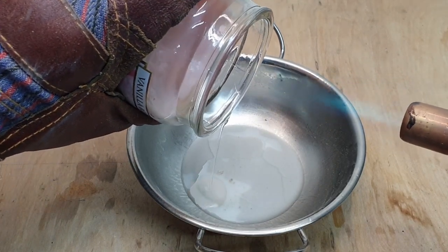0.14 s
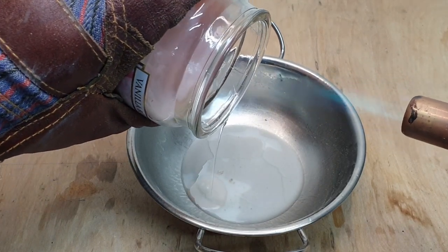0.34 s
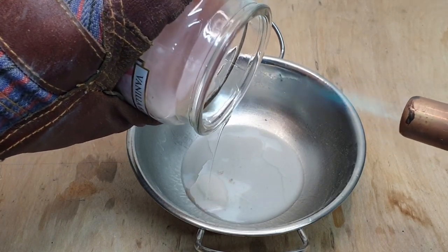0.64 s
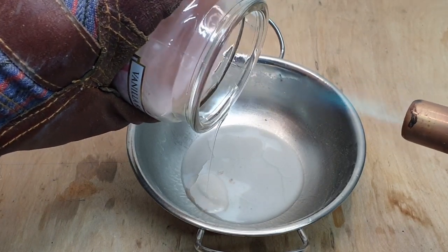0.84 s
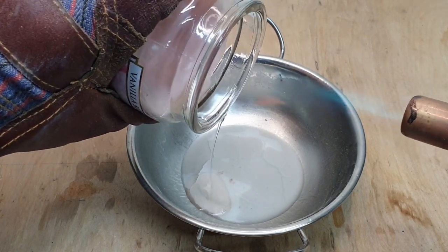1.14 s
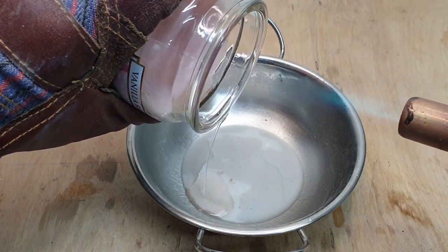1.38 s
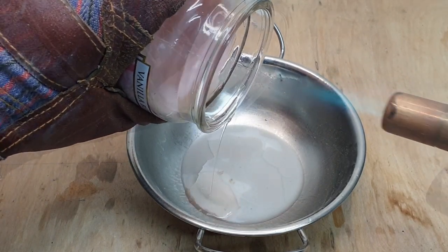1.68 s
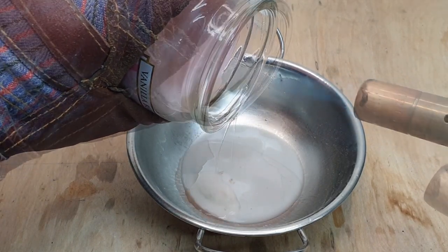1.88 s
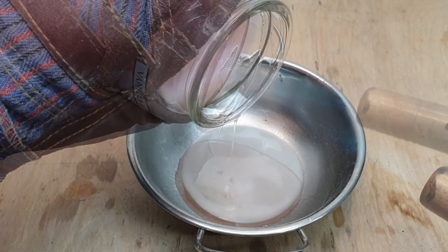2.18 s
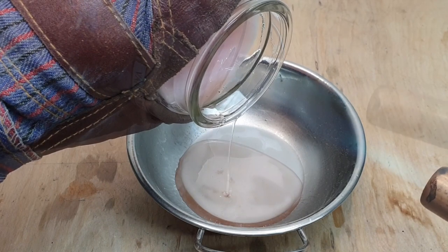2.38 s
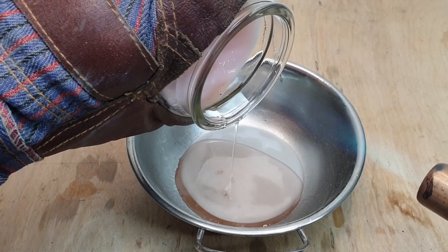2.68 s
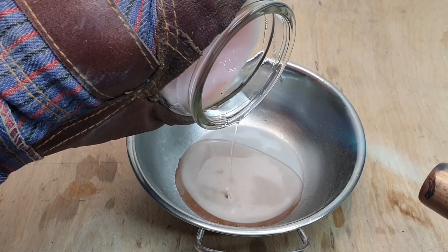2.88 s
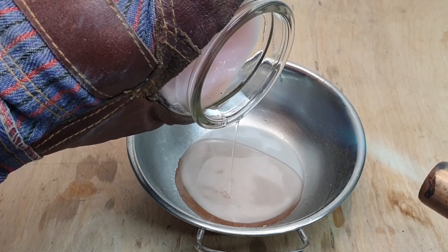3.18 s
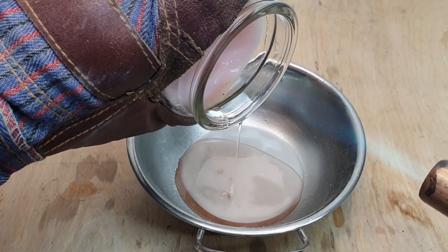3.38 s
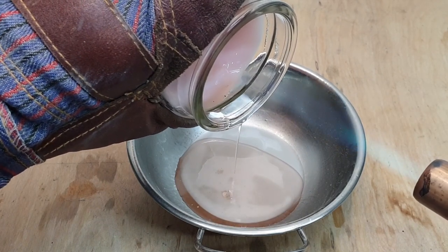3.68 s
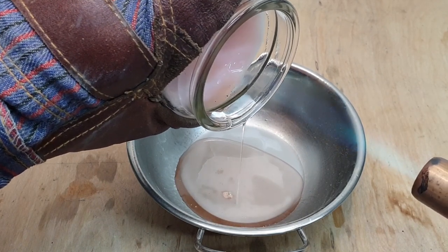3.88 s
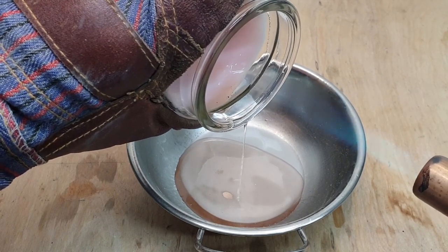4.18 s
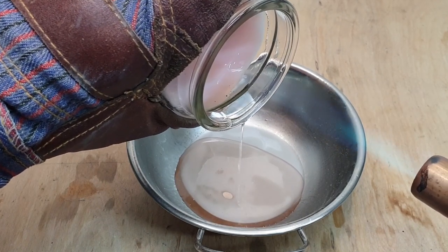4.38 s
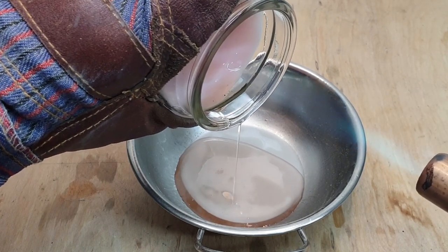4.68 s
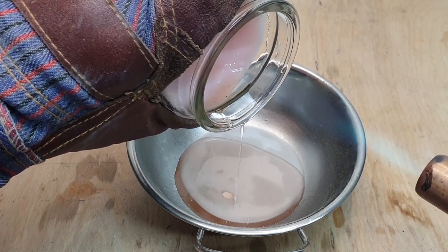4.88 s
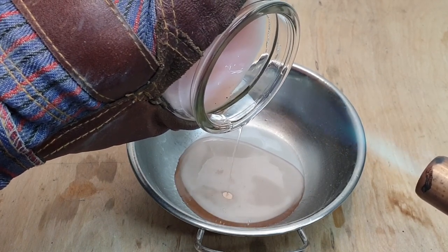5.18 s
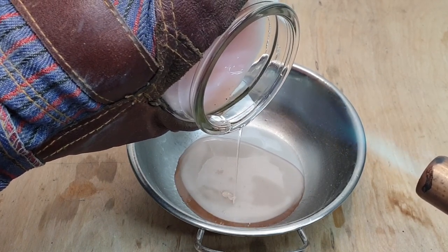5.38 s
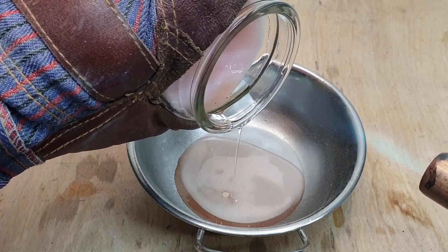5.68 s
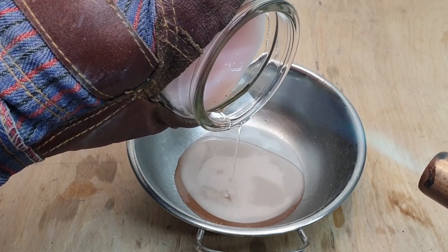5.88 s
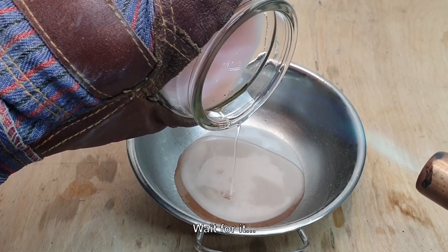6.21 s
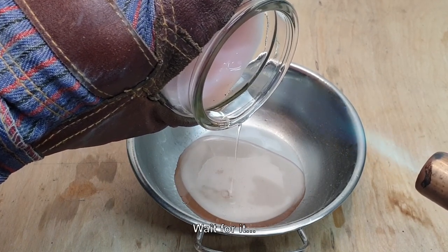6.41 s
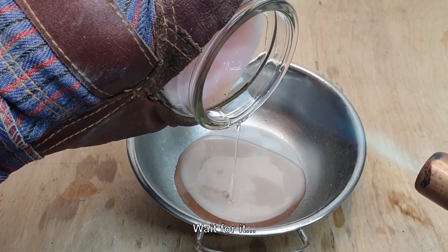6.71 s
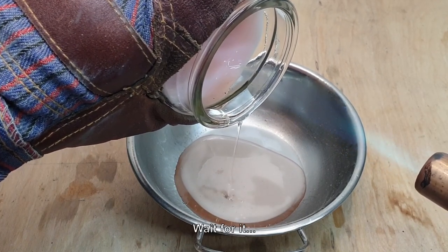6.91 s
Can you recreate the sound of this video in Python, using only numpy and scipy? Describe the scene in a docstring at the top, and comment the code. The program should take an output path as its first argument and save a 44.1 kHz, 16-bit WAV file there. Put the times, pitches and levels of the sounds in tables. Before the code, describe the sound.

Close mono pickup of a handheld gas torch in a workshop, already burning at the start and continuing to the end at about seven seconds. A soft, low roar sits under a bright gas hiss, coloured by short reflections from bowl, jar and bench, above a barely audible rumble. For the first two seconds a breathy, high nozzle whistle wavers and sags; a ragged puff flares at 0.6. Tiny wax spits tick at 0.9, 1.4 and 1.7. From 1.7 to 2.3 the hiss dips and changes tone, with quick flame flutters, then settles steadier with only faint whistle, a bright band swelling near 2.7. A short, low surge bumps at 3.2, followed by clearer spits at 3.5 and 3.7. Soft pops come at 4.0, 4.3 and 4.5, with a grainy swish around 4.25 and another at 6.0. Sparse faint spits continue as the hiss holds without ending.

```python
"""Gas torch melting wax out of a jar

Close to one microphone, a handheld torch melts wax out of a glass jar over a steel bowl in a workshop. The
flame is a steady low roar of coloured noise; the gas jet is bright noise, with a breathy nozzle whistle that is
strong in the first view and faint in the second. Bowl, jar and bench add short echoes to both. Around two
seconds the scene crossfades from the first view to a second one, and the level dips. Hot wax spits in tiny
noise bursts; brief flutters, flares, swishes, edge tones, surges and pops pass over a faint rumble."""
import sys
import numpy as np
from scipy import signal
from scipy.fft import rfft, irfft, next_fast_len
from scipy.io import wavfile
from scipy.ndimage import map_coordinates

SR = 44100
rng = np.random.default_rng(int(sys.argv[2]) if len(sys.argv) > 2 else 0)


def transcribe(u):
    """Save the signal u as a 16-bit wav file named by the first command-line argument.

    u: samples, shape (n,) or (channels, n), limited to [-1, 1]; the rate is SR.
    q: integer samples, one column per channel.
    """
    v = np.clip(np.atleast_2d(u).T, -1, 1)
    q = np.round(v * 32767).astype(np.int16)
    wavfile.write(sys.argv[1], SR, q)


N = 310905

# crossfade between the views for the bright sounds: (fade-out middle/s, its length/s, fade-in middle/s, its
# length/s)
BRIGHT_FADE = (1.86, 0.9, 2.19, 0.73)


def amp(db):
    """Decibels to gain."""
    return 10 ** (np.asarray(db) / 20)


def unit(x):
    """Scale to rms 1."""
    return x / np.sqrt(np.mean(x ** 2) + 1e-20)


def clock():
    """The time of every sample in seconds."""
    return np.arange(N) / SR


def curve(points):
    """(t/s, value) points joined by straight lines."""
    return np.interp(clock(), *np.transpose(points))


def wobble(rate):
    """A smooth random curve through `rate` random knots a second."""
    knots = rng.standard_normal(int(N * rate / SR) + 4)
    return map_coordinates(knots, [clock() * rate])


def fade(middle, length):
    """A straight rise from 0 to 1."""
    return np.clip(.5 + (clock() - middle) / length, 0, 1)


def crossfaded(first, second, timing):
    """The first view fades before the second is fully there, so the level dips between them."""
    return (1 - fade(*timing[:2])) * first + fade(*timing[2:]) * second


def swell(s, length):
    """A bell-shaped rise and fall around time s, down to 1/e^2 at `length` seconds either side."""
    return np.exp(-2 * ((clock() - s) / length) ** 2)


def swells(rows):
    """The joint envelope of (t/s, half-length/s, level/dB) swells."""
    return sum(amp(db) * swell(s, length) for s, length, db in rows)


def colour(points, hz):
    """Gain of (f/Hz, level/dB) points joined on a log frequency axis."""
    f, db = np.transpose(points)
    return amp(np.interp(np.log(hz + 1), np.log(f + 1), db))


def filtered(x, response):
    """Filter x by a response given as a function of frequency."""
    size = next_fast_len(N + 8192)
    hz = np.fft.rfftfreq(size, 1 / SR)
    return irfft(rfft(x, size) * response(hz), size)[:N]


def turbulence(spectrum, echoes=(), notches=()):
    """Coloured noise of rms 1, combed by short echoes and shaped by narrow notches or peaks."""
    def response(hz):
        comb = 1 + sum(gain * np.exp(-2j * np.pi * hz * ms / 1000) for ms, gain in echoes)
        notch_db = sum(db * np.exp(-((hz - centre) / width) ** 2) for centre, width, db in notches)
        return colour(spectrum, hz) * comb * amp(notch_db)
    return unit(filtered(rng.standard_normal(N), response))


def breathy(resonances):
    """Noise of rms 1 in a few narrow resonances."""
    def modes(hz):
        return sum(amp(db) / (1 + ((hz - centre) / width) ** 4) for centre, width, db in resonances)
    return unit(filtered(rng.standard_normal(N), modes))


def surroundings(x, wet_db=-13, t60=0.06):
    """Many weak later reflections, decaying 60 dB in t60 seconds, groove the hiss with fine, steady lines."""
    t = np.arange(SR // 8) / SR
    tail = rng.standard_normal(len(t)) * amp(-60 * t / t60)
    tail = tail * (t > .008)  # leave the first 8 ms to the separate echoes
    return x + amp(wet_db) * signal.fftconvolve(x, tail / np.linalg.norm(tail))[:N]


def puffs(rows, spectrum, ragged_db):
    """Short swells of turbulence, made ragged by a fast random level."""
    return swells(rows) * unit(turbulence(spectrum) * amp(ragged_db * wobble(200)))


def workshop(level_db=-55):
    """The workshop background: a faint, steady low rumble of noise."""
    # (f/Hz, level/dB per Hz)
    rumble = [(15, -16), (35, -7), (85, 0), (140, 2), (400, -38), (2000, -54), (8000, -70)]
    return amp(level_db) * turbulence(rumble)


def flame(level_db=-32.5, restless_db=0.5):
    """Turbulent burning roars steadily in the low resonances of the burner."""
    # roar in each view: (f/Hz, level/dB per Hz)
    first_spectrum = [(20, -26), (40, -22), (110, -21.5), (190, -2.5), (235, 0.5), (290, -13.5), (450, .5),
                      (620, -16.5), (1000, -17), (1200, -22), (1380, -30.5), (1550, -33), (1970, -27.5),
                      (2040, -42), (2600, -120)]
    second_spectrum = [(20, -32), (40, -20.5), (110, -22.5), (190, -0.5), (235, -2.5), (290, -11.5),
                       (455, 0), (600, -15), (680, -15.5), (715, -18), (760, -17.5), (1000, -17),
                       (1200, -25.5), (1380, -30.5), (1550, -26), (1970, -27.5), (2040, -37.5),
                       (2600, -120)]
    # strongest echoes off bowl, jar and bench in each view: (delay/ms, gain)
    first_echoes = [(3.216, 0.12), (4.411, -0.19), (5.7, -0.14), (6.455, 0.11)]
    second_echoes = [(2.627, 0.15), (3.397, 0.11), (4.524, -0.09), (5.607, -0.14), (6.157, 0.1)]
    # crossfade between the views: (fade-out middle/s, its length/s, fade-in middle/s, its length/s)
    roar_fade = (1.966, 0.69, 2.19, 0.72)
    # slow swells of the roar with the hand's aim: (t/s, level/dB)
    roar_level = [(0, -0.1), (.5, .5), (.9, -1), (1.1, 0.8), (1.5, -0.4), (2.15, -1.5), (2.53, -0.1),
                  (2.72, -1.5), (3.0, 0.3), (3.7, 0.1), (4.5, 0), (5.0, -0.5), (5.35, .5), (5.9, -.5),
                  (6.4, 0.4), (7.05, .5)]
    first = amp(level_db) * turbulence(first_spectrum, first_echoes)
    second = amp(level_db) * turbulence(second_spectrum, second_echoes)
    return crossfaded(first, second, roar_fade) * amp(curve(roar_level) + restless_db * wobble(18))


def jet(first_db=-46.5, second_db=-46.0, flicker_db=0.5, drift_db=0.46):
    """Gas hisses out of the orifice, trembling a little with the flow and swaying with the aim."""
    # hiss in each view: (f/Hz, level/dB per Hz)
    first_spectrum = [(1400, -120), (1950, -43), (2100, -6), (3100, -1), (3750, -9), (4950, -4), (5650, 9),
                      (6050, 4.5), (6800, -1), (7500, -6), (9000, -15.5), (12000, -18.5), (13500, -26),
                      (15500, -26)]
    second_spectrum = [(1400, -120), (1950, -27), (2100, -14), (3100, -11.5), (3600, -13), (3900, -18),
                       (4500, -17), (4900, -9.5), (5300, -3.5), (5700, -0.5), (6400, -2), (7150, -8.5),
                       (7480, -16), (8200, -21), (9000, -23), (11600, -28.5), (12700, -32), (13800, -39),
                       (15500, -35)]
    # strongest echoes off bowl, jar and bench in each view: (delay/ms, gain)
    first_echoes = [(0.933, 0.12), (2.392, -0.1), (3.489, -0.11)]
    second_echoes = [(0.937, -0.09), (1.053, -0.13), (1.397, 0.11), (1.598, -0.11)]
    # narrow bands that reflections weaken, or lift where positive: (f/Hz, width/Hz, level/dB)
    first_notches = [(2010, 34, 4), (4100, 150, -1.5), (5940, 50, -7), (6270, 50, -4), (13200, 550, -5)]
    second_notches = [(2030, 35, -4), (2420, 94, -3), (2810, 40, -4), (4050, 55, -6), (4430, 70, -3),
                      (4660, 55, -11), (5090, 37, -14), (6130, 38, -7), (5940, 30, -14)]
    # hiss level in each view, the first sagging as the hand sways: (t/s, level/dB)
    first_level = [(0, .5), (.1, -1), (.19, 1), (.3, -1), (.47, 0), (.53, -2), (.63, 0.5), (.76, -0.5),
                   (1.13, 0), (1.26, -1), (1.38, 1), (1.5, -0.5), (1.58, 1), (1.71, 2), (1.77, 1),
                   (1.85, 1), (1.95, 3.5)]
    second_level = [(2.0, 2.5), (2.3, 0.8), (2.6, -1.4), (2.85, 0), (3.3, -0.1), (3.9, 0.1), (4.35, 0.6),
                    (4.9, 1), (5.4, -0.6), (7.05, 0.5)]
    first = surroundings(turbulence(first_spectrum, first_echoes, first_notches))
    second = surroundings(turbulence(second_spectrum, second_echoes, second_notches))
    first = amp(first_db + curve(first_level)) * first
    second = amp(second_db + curve(second_level)) * second
    return crossfaded(first, second, BRIGHT_FADE) * amp(flicker_db * wobble(40) + drift_db * wobble(5.3))


def whistle(second_db=-53, waver_db=1.25):
    """The jet excites narrow, breathy nozzle resonances, strongly in the first view and faintly in the second."""
    # nozzle resonances in each view: (f/Hz, width/Hz, level/dB)
    first_modes = [(5620, 83, 3.5), (5340, 50, -9), (6030, 55, -5), (6600, 120, -11), (7150, 90, -15),
                   (8300, 220, -24), (9350, 140, -21.5), (11850, 280, -31), (14500, 500, -37)]
    second_modes = [(2655, 50, -4.5), (3096, 59, -4), (4570, 30, -6.5), (5456, 41, 5.5), (5660, 32, 1),
                    (6040, 63, 4), (6370, 50, -3)]
    # whistle in the first view, sagging as the hand sways: (t/s, level/dB)
    first_level = [(0, -46), (.42, -46), (.55, -50.5), (.75, -47.5), (.92, -49.5), (1.05, -45), (1.17, -50),
                   (1.25, -64), (1.33, -46), (1.45, -44.5), (1.56, -48), (1.63, -57), (1.8, -54),
                   (1.95, -52)]
    first = amp(curve(first_level)) * breathy(first_modes)
    second = amp(second_db) * breathy(second_modes)
    return crossfaded(first, second, BRIGHT_FADE) * amp(waver_db * wobble(24.3))


def swishes(grain_db=2.5):
    """The jet grazes the rim and its gas breaks there in grainy bursts."""
    # (t/s, half-length/s, level/dB)
    grazes = [(0.03, .04, -51), (1.708, 0.044, -54), (1.9, 0.05, -52), (2.72, 0.09, -53),
              (4.237, .024, -51), (4.275, .05, -49), (6.04, 0.058, -51)]
    # (f/Hz, level/dB per Hz)
    spectrum = [(2000, -12), (4200, -3), (5500, 6), (7000, 9), (8200, -7), (9700, -13), (11300, -12),
                (12700, -9), (13800, -19), (15500, -29)]
    return puffs(grazes, spectrum, grain_db)


def spit(hz, life=0.019, breadth=0.12, rise=0.00059):
    """One tiny burst of wax: a narrow band of noise, peak 1, that dies 60 dB in `life` seconds."""
    t = np.arange(SR // 40) / SR
    band = np.exp(-((np.fft.rfftfreq(len(t), 1 / SR) / hz - 1) / breadth) ** 2)
    noise = irfft(rfft(rng.standard_normal(len(t))) * band, len(t))
    burst = noise * amp(-60 * t / life) * (1 - np.exp(-t / rise))
    return burst / np.abs(burst).max()


def wax(count=24, faint_db=-55, faint_hz=9000):
    """Hot wax spits clearly at set times, with a random scatter of faint spits among them."""
    # clear spits: (t/s, peak level/dB, f/Hz)
    clear = [(.901, -47, 8830), (1.082, -57, 12470), (1.399, -42, 8670), (1.501, -55, 13500),
             (1.704, -47, 12000), (1.754, -55, 13800), (2.604, -45, 8700), (3.530, -40, 3480),
             (3.672, -42.5, 4420), (4.237, -50, 9600), (5.358, -50, 13300), (5.822, -44, 9340),
             (6.277, -48, 9440)]
    # faint spits spread over 6 dB and half an octave
    faint = [(u * N / SR, faint_db + 6 * (v - .5), faint_hz * 2 ** ((w - .5) / 2))
             for u, v, w in rng.random((count, 3))]
    out = np.zeros(N + SR)
    for s, db, hz in list(clear) + faint:
        burst = amp(db) * spit(hz)
        out[round(s * SR):][:len(burst)] += burst
    return out[:N]


def flares():
    """The flame flares with bright, ragged puffs of turbulence."""
    # (t/s, half-length/s, level/dB)
    bursts = [(.562, 0.022, -32.5), (.586, 0.021, -30)]
    # (f/Hz, level/dB per Hz)
    spectrum = [(60, 0), (170, 15), (480, 18.5), (700, 8.5), (1000, 0.5), (1400, -5.5), (2600, -6),
                (4500, -15), (6700, -9), (10000, -24), (15000, -31)]
    return puffs(bursts, spectrum, ragged_db=2.5)


def shimmer(level_db=-63.0, flicker_db=2.0):
    """Thin upper bands of the hiss in the second view, each flickering on its own."""
    # (f/Hz, width/Hz, level/dB)
    upper_bands = [(7910, 210, 2), (8520, 170, -2.5), (9740, 170, -4.5), (10850, 170, -7),
                   (11200, 120, -10.5), (12150, 230, -6), (14900, 260, -19)]
    bands = sum(breathy([(hz, width, 0)]) * amp(db + flicker_db * wobble(22))
                for hz, width, db in upper_bands)
    return amp(level_db) * unit(bands) * fade(*BRIGHT_FADE[2:])


def flutters():
    """The flame tears and flutters in short ragged swells of turbulence."""
    # (t/s, half-length/s, level/dB)
    tears = [(1.897, 0.034, -33.5), (1.932, 0.023, -33), (1.962, 0.04, -38.5), (2.034, 0.043, -32.5),
             (2.125, 0.025, -39.5)]
    # (f/Hz, level/dB per Hz)
    spectrum = [(30, -11), (200, 14), (480, 14), (650, 7), (900, 4.5), (1330, 3), (1600, -16), (2000, -21),
                (3000, -19), (4000, -23), (4700, -12), (5700, -17), (7300, -21), (8300, -34), (15000, -49)]
    return puffs(tears, spectrum, ragged_db=2.0)


def settling():
    """A bright band swells in the hiss and dies away early in the second view."""
    # (t/s, half-length/s, level/dB)
    rises = [(2.3, 0.4, -59), (2.68, 0.4, -52.5)]
    # (f/Hz, width/Hz, level/dB)
    band = [(6600, 330, 0)]
    return swells(rises) * surroundings(breathy(band))


def edge_tones(fall_hz_per_s=5500, width_hz=170):
    """The rim sings: a breathy resonance slides down as the jet moves along it."""
    # (t/s, half-length/s, level/dB, f/Hz at that time)
    tones = [(2.745, 0.06, -64, 10050), (4.278, 0.063, -63, 10100), (6.04, .04, -69, 10100)]
    out = np.zeros(N)
    for s, length, db, hz in tones:
        t = clock() - s
        # slow noise modulates the tone and spreads it by width_hz to either side
        breath = unit(filtered(rng.standard_normal(N), lambda f: 1 / (1 + (f / width_hz) ** 4)))
        tone = np.sqrt(2) * np.sin(2 * np.pi * (hz * t - fall_hz_per_s * t ** 2 / 2))
        out += amp(db) * swell(s, length) * breath * tone
    return out


def surges(length=0.013):
    """A pocket of gas burns at once and pushes the burner for a few cycles."""
    # (t/s, peak level/dB, f/Hz)
    pushes = [(3.229, -20.5, 444)]
    return sum(amp(db) * swell(s, length) * np.sin(2 * np.pi * hz * (clock() - s)) for s, db, hz in pushes)


def pops(length=0.0005):
    """A small pocket of flame collapses softly: one brief dip in pressure."""
    # (t/s, peak level/dB)
    collapses = [(4.044, -29), (4.29, -27), (4.479, -23)]
    return sum(-amp(db) * swell(s, length) for s, db in collapses)


def scene():
    """The torch and the melting wax over the workshop rumble, in one channel."""
    steady = workshop() + flame() + jet() + whistle() + shimmer() + settling()
    flame_events = flares() + flutters() + surges() + pops()
    rim_events = swishes() + edge_tones()
    return (steady + flame_events + rim_events + wax())[None]


def record(dry, top_hz=15750):
    """The microphone channel keeps nothing above its band limit."""
    return np.array([filtered(channel, lambda hz: hz < top_hz) for channel in dry])


dry = scene()
out = record(dry)
transcribe(out)
```